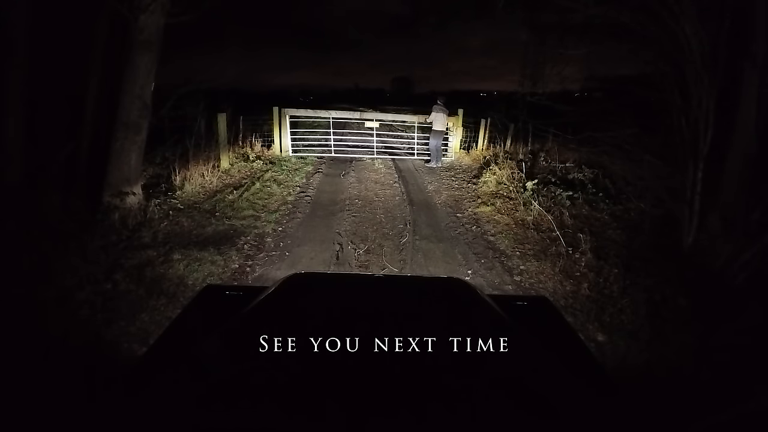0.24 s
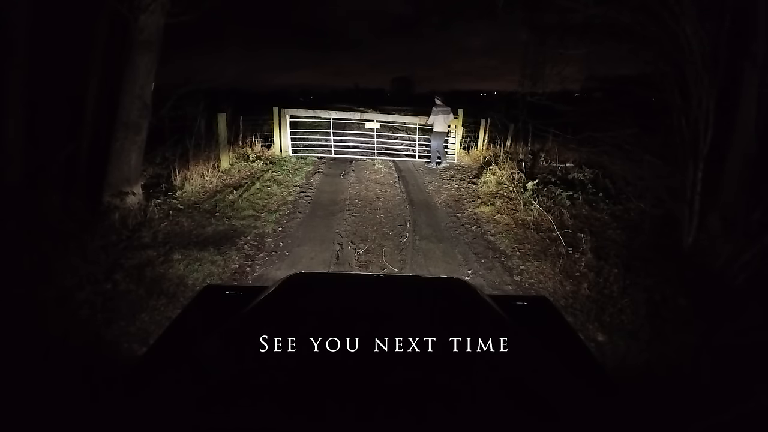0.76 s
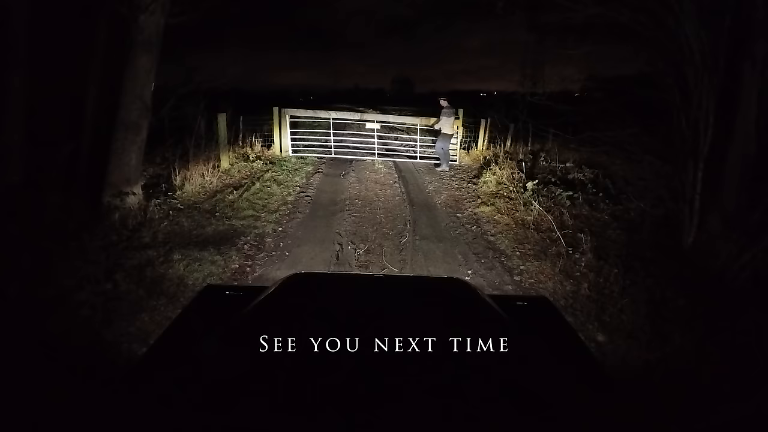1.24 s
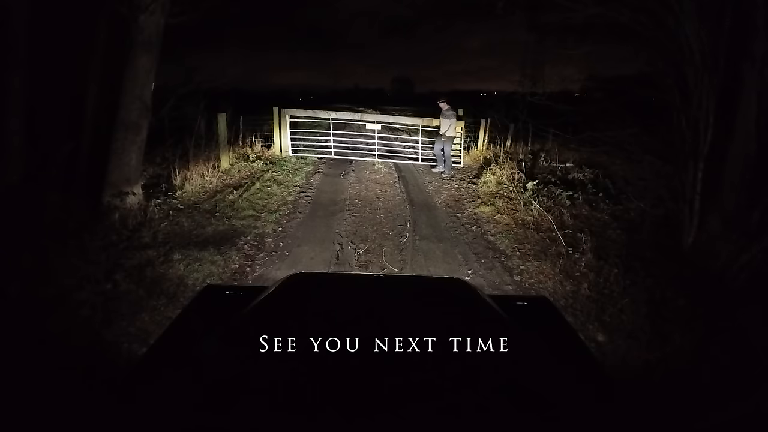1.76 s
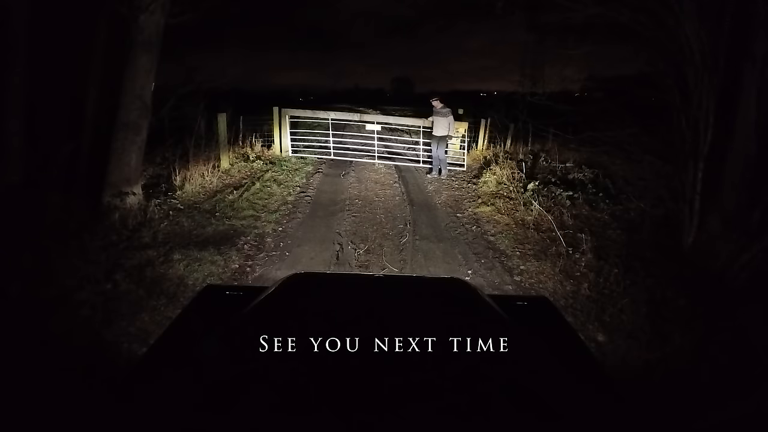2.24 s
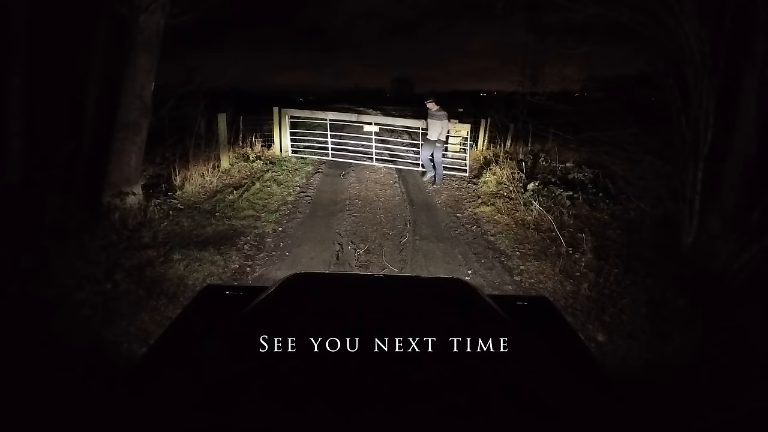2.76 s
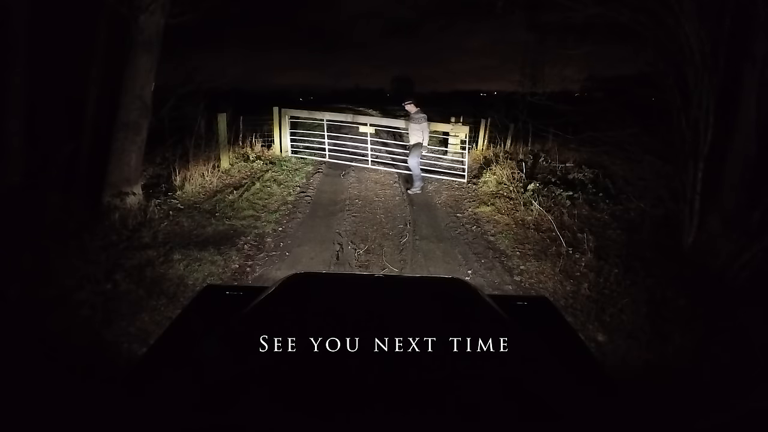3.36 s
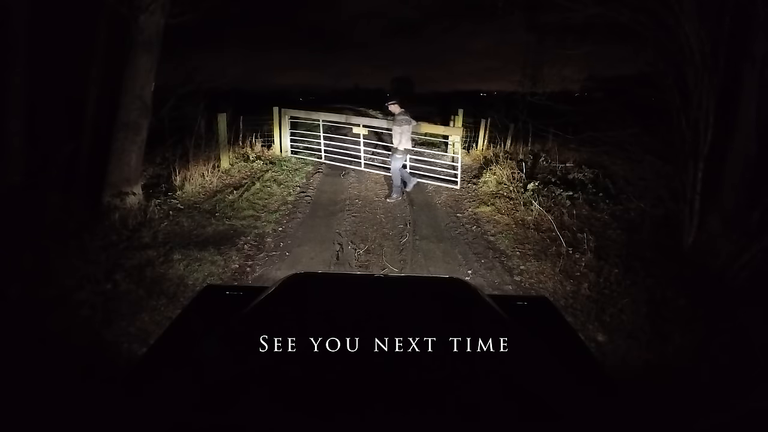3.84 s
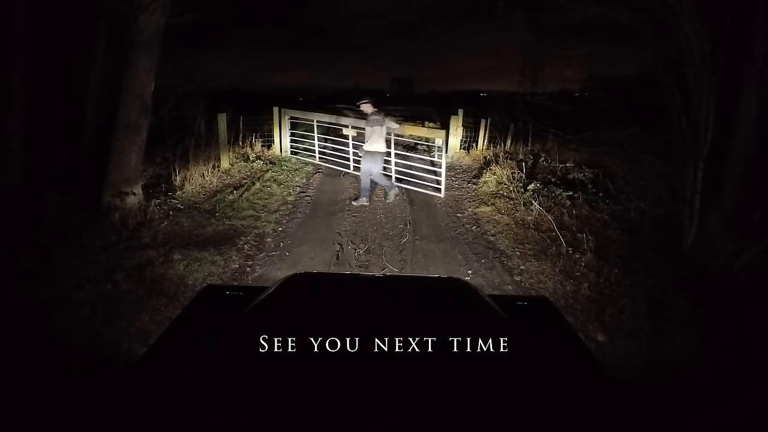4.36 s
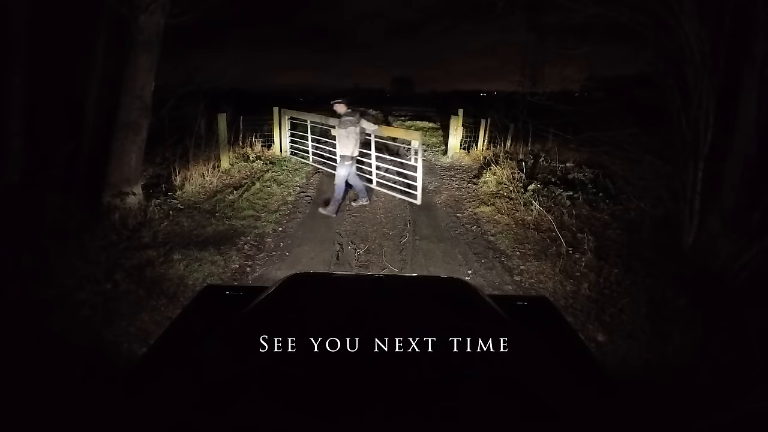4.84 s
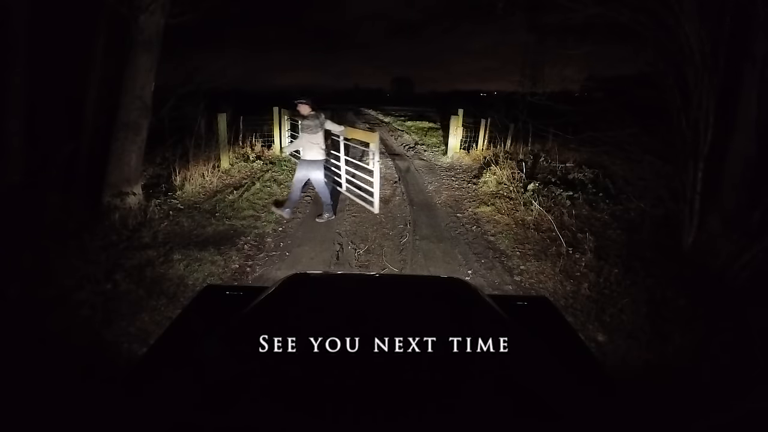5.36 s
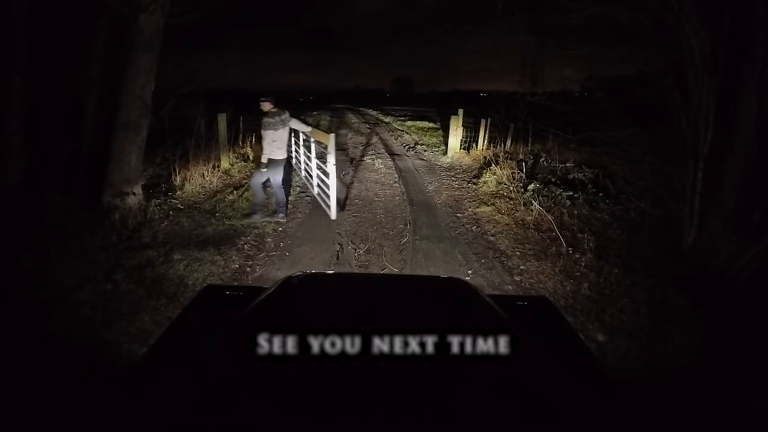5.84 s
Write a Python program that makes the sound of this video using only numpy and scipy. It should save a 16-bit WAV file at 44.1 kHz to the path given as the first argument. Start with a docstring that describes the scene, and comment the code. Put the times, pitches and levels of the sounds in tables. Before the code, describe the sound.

A vehicle engine idles steadily for the whole six seconds: a low, soft hum around 70 Hz with slight wavering, a faint belt and fan whirr, and gently pulsing machine noise. Almost immediately, at 0.01 to 0.15 s, a sprung steel bolt some way ahead slides with a rough, high stick-slip squeak and slams its stop at 0.05 s, a sharp bright clank with tiny rapid bounces. At 0.38 to 0.5 s it is let go: another brief, higher squeak and a softer double clank, with a minor tick at 0.62 s. Hollow frame knocks vanish quickly; thin bar tones between 2 and 5 kHz ring and beat for about a second, with a short scattered tail from trees. A faint crunch comes at 2.1 s, then soft gritty footsteps at about 2.7, 3.2, 3.8, 4.5, 5.0, 5.6 and 6.1 s, barely above the idle.

```python
"""Field gate unlatched beside an idling engine

A steel gate is unlatched some way ahead of a vehicle whose engine idles: firing tones, whirr and pulsing noise.
The sprung bolt squeaks in stick-slip as it slides, and clanks against its stop, once drawn and once let go.
Each contact is a noise crack that sets decaying modes ringing in the frame and bars; trees add a scattered tail.
Faint steps, swells of uneven noise, crunch on the track as the gate is walked open."""
import sys
import numpy as np
from scipy import signal
from scipy.fft import rfft, irfft, next_fast_len
from scipy.io import wavfile
from scipy.ndimage import map_coordinates

SR = 44100
rng = np.random.default_rng(int(sys.argv[2]) if len(sys.argv) > 2 else 0)


def dump_mix(stems):
    """Bounce the given channels to the path in sys.argv[1] as a 16-bit WAV at rate SR."""
    frames = np.atleast_2d(stems).T  # one column per channel
    limited = np.clip(frames, -1, 1)  # hard clip at full scale
    pcm = np.round(limited * 32767).astype(np.int16)
    wavfile.write(sys.argv[1], SR, pcm)


N = 269010
T = np.arange(N) / SR
RING = int(1.5 * SR)  # samples given to the latch sounds


def amp(db):
    """Decibels to amplitude."""
    return 10 ** (np.asarray(db) / 20)


def unit(x):
    """Scale to rms 1."""
    return x / np.sqrt(np.mean(x ** 2) + 1e-20)


def along(points, hz):
    """Read a curve of (Hz, value) points on a log frequency axis."""
    point_hz, value = np.transpose(points)
    return np.interp(np.log(hz + 1), np.log(point_hz + 1), value)


def fade(t, t60):
    """Free decay, 60 dB in t60 seconds."""
    return np.exp(-np.log(1000) * np.maximum(t, 0) / t60)


def pan(db):
    """Left and right gains for a level difference; positive leans left."""
    return amp(np.array([[.5], [-.5]]) * db)


def wobble(rate, size=N):
    """A smooth random curve, rate knots a second (2000 at most)."""
    knots = rng.standard_normal(size // 20 + 4)
    return map_coordinates(knots, [T[:size] * min(rate, 2000)])


def filtered(x, response):
    """Multiply the spectrum of x by a response of frequency."""
    n = x.shape[-1]
    padded = next_fast_len(n + SR // 4, True)
    spectrum = rfft(x, padded) * response(np.fft.rfftfreq(padded, 1 / SR))
    return irfft(spectrum, padded)[..., :n]


def noise(spectrum, channels=1, size=N):
    """Coloured noise of rms 1."""
    white = rng.standard_normal((channels, size))
    return unit(filtered(white, lambda hz: amp(along(spectrum, hz))))


def engine(firing_hz=34.9, rush_db=-51.5, throb=0.058, unsteady_db=0.5):
    """Exhaust tones on the firing rate, a whirr of belt and fan, and machine noise that pulses with each firing."""
    # exhaust tones: multiple of the firing rate, level_db
    exhaust = [(1, -59.5), (2, -44.5), (3, -51.5), (7, -68)]
    # wavering tones of belt and fan: pitch_hz, width_hz (waver knots a second), level_db
    belt_and_fan = [(165.4, 4, -65.5), (243.4, 14, -61.5), (498, 8, -71), (535.4, 18, -64.5),
                    (790, 51, -76), (898, 14, -70.5)]
    # colour of the machine noise: freq_hz, relative level_db per Hz
    rush_colour = [(20, -8.5), (45, 6), (85, 0), (130, -3), (190, -6.5), (260, -2), (420, -8), (620, -12),
                   (900, -10), (1300, -18.5), (2700, -28.5), (4200, -39.5), (7000, -39), (8000, -50),
                   (10500, -55.5), (12500, -52.5), (13500, -66)]
    # left-right likeness of the machine noise: freq_hz, correlation (0 to 1)
    likeness = [(60, 0.98), (300, 1), (700, 0.93), (1300, 0.85), (2400, 0.46), (4400, 0.27), (8000, 0)]
    # stereo lean of the whole engine: freq_hz, left_over_right_db
    lean = [(60, 1), (2400, 0), (4400, -2.5), (8000, -3.5), (15000, -7)]

    phase = 2 * np.pi * np.cumsum(firing_hz * (1 + 0.0034 * wobble(3.074))) / SR
    hum = 0
    for multiple, db in exhaust:
        level = amp(db + unsteady_db * wobble(4.9)) * np.sqrt(2)
        hum = hum + level * np.sin(multiple * phase + rng.uniform(0, 2 * np.pi))

    whirr = 0
    for hz, width, db in belt_and_fan:
        angle = 2 * np.pi * hz * T
        whirr = whirr + amp(db) * unit(wobble(width) * np.sin(angle) + wobble(width) * np.cos(angle))

    def mid_side_gains(hz):
        turn = np.arccos(np.clip(along(likeness, hz), -1, 1)) / 2
        return np.array([np.cos(turn), np.sin(turn)])

    mid, side = filtered(noise(rush_colour, channels=2), mid_side_gains)
    rush = amp(rush_db) * unit(np.array([mid + side, mid - side])) * (1 + throb * np.sin(phase))
    return filtered(hum + whirr + rush, lambda hz: pan(along(lean, hz)))


def steps(step_s=0.071, crunch_s=0.018, grit_db=3.0, clump_db=2.0):
    """Each boot presses a swell of gritty stone noise out of the track, in uneven clumps."""
    # boots on the track: peak_s, level_db
    boots = [(2.72, -78.5), (3.24, -76.5), (3.83, -75.5), (4.48, -78), (5.045, -72), (5.62, -74.5),
             (6.09, -71.5)]
    # single sharp crunches: peak_s, level_db
    crunches = [(2.098, -70), (5.014, -75.5), (5.812, -75)]
    # colour of the stones: freq_hz, relative level_db per Hz
    stone_colour = [(800, -18), (2800, 2), (5500, 4), (8000, -7.5), (11000, -10.5), (13500, -9.5),
                    (16000, -19)]

    def swells(rows, width_s):
        return sum(amp(db) * np.exp(-((T - s) / width_s) ** 2) for s, db in rows)

    weight = swells(boots, step_s) + swells(crunches, crunch_s)
    unevenness = amp(grit_db * wobble(900) + clump_db * wobble(45))
    return pan(-4.5) * weight * unit(noise(stone_colour, channels=2) * unevenness)


def trees(x, wet_db):
    """Trunks and ground scatter a short tail, different at each ear."""
    # decay of the scattered sound: freq_hz, t60_s
    tail_decay = [(500, 0.36), (2500, 0.43), (5000, .39), (9000, 0.26), (14000, .22)]
    hz, t, z = signal.stft(rng.standard_normal((2, SR)), SR, nperseg=256)
    decayed = z * fade(t, along(tail_decay, hz)[:, None])
    tail = signal.istft(decayed, SR, nperseg=256)[1]
    tail = tail / np.linalg.norm(tail[0])
    return amp(wet_db) * signal.fftconvolve(x, tail, axes=1)[:, :x.shape[1]]


def sliding(t, hold_s=0.01186, t60_s=0.2096):
    """How hard the bolt rubs in its sleeve: each slide rises, holds at full speed and dies."""
    # drawn, then let go: full_speed_s, rise_s, level_db
    slides = [(0.051, 0.043, -38), (.398, 0.03, -43.5)]
    rub = 0
    for s, rise, db in slides:
        gathering = np.clip(1 + (t - s) / rise, 0, 1) ** 2
        rub = rub + amp(db) * gathering * fade(t - s - hold_s, t60_s)
    return rub


def contacts(count=6, first_gap_s=.0063, widen=1.22, uneven=.12, knock_follows=0.69):
    """Each blow and its ever weaker bounces, as rows (s, crack dB, knock dB, ring dB, bolt position)."""
    # the bolt striking steel: start_s, level_db, knock_db and ring_db (both relative to level_db),
    # loss_db per bounce, bolt position (0 drawn to 1 let go)
    blows = [(.032, -38.5, -16, 2, 13, 0.086), (0.0507, -24, -0.5, -1.5, 3.3, 0.018),
             (.408, -32.5, -10, -2, 8, 0.49), (.4213, -30, -0.5, 0, 2.5, 0.88),
             (.474, -43.5, 9, -2, 9.5, 0.87), (.620, -59, -15, -5, 5, .4)]
    rows, bounce = [], np.arange(count)
    for s, db, knock_db, bars_db, loss_db, position in blows:
        # gaps widen by a ratio, unevenly
        gaps = first_gap_s * widen ** bounce * np.exp(uneven * rng.standard_normal(count))
        times = s + np.cumsum(gaps) - gaps
        lost_db = loss_db * bounce
        # the frame's knock follows only a share of the loss
        knocks = db + knock_db - knock_follows * lost_db
        rows += zip(times, db - lost_db, knocks, db + bars_db - lost_db, [position] * count)
    return np.array(rows)


def ringing(modes, blows, scatter_db, flutter, flutter_rate=90):
    """Modes fed by (s, dB, bolt position) blows; the loose bolt makes each one beat, differently at each ear."""
    out, t = np.zeros((2, RING)), T[:RING]
    s, db, position = np.transpose(blows)
    for hz, drawn_db, free_db, t60 in modes:
        mode_db = drawn_db + position * (free_db - drawn_db)
        size = amp(db + mode_db + scatter_db * rng.standard_normal(len(s)))
        # each blow adds energy, which then leaks away
        struck = np.bincount((s * SR).astype(int), size ** 2, RING)
        energy = signal.lfilter([1], [1, -fade(1 / SR, t60) ** 2], struck)
        # part of the flutter is shared by both ears
        knots = rng.standard_normal((3, 200)) + 1j * rng.standard_normal((3, 200))
        left, right, both = (np.interp(t * flutter_rate, np.arange(len(k)), k) for k in knots)
        beats = (1 + flutter * (both + np.array([left, right]) / 2)) / np.sqrt(1 + 2 * flutter ** 2)
        carrier = np.exp(2j * np.pi * (hz * t + rng.random()))
        out += np.sqrt(energy) * np.real(beats * carrier)
    return out


def clanks(ring_db=-11, tube_db=-13.0, grit_db=2.5, crack_t60_s=.08):
    """The bolt scrapes along; each contact cracks, knocks the hollow frame and rings the bars."""
    # bolt and gate bars: pitch_hz, drawn_db, let_go_db, t60_s
    bar_modes = [(2392, 0.5, -20.5, .58), (2440, -9.5, -9.5, 1.32), (2440, -8, -16.5, 0.292),
                 (2720, -23, -28, 0.32), (2833, -23.5, -9, 0.66), (2970, -16, -15.5, 0.58),
                 (3035, -4, -18, .4), (3320, -9.5, -23.5, 0.2), (3510, -20.5, -16.5, 0.36),
                 (4268, -13.5, -3.5, 0.81), (4470, -13, -18, 0.48), (4750, -7.5, -26.5, .38),
                 (4745, -11, -13, 0.425), (5200, -21.5, -21, .38), (7240, -20, -30, 0.45)]
    # the quickly damped hollow frame: pitch_hz, drawn_db, let_go_db, t60_s
    frame_modes = [(558, -5, -23, 0.083), (686, -3, -21, 0.084), (790, -0.5, 3, 0.068),
                   (835, -2.5, 0, 0.082), (1010, -13.5, -15, 0.081), (1160, -5.5, 0.5, .11),
                   (1260, -10, -6, 0.11), (1471, -3, -6, 0.11), (1710, -1.5, -21, 0.07),
                   (1967, -4.5, -6.5, .1)]
    # crowded short-lived modes of a hard contact: freq_hz, relative level_db per Hz
    hard_colour = [(350, -41), (550, -10.5), (1700, -7.5), (2100, -8.5), (2700, 4), (3400, -2.5),
                   (4900, -4), (6200, -8.5), (8000, -12), (10500, -20), (13000, -19.5), (16000, -32.5)]
    # the same for a softer contact: freq_hz, relative level_db per Hz
    soft_colour = [(400, -45), (800, -14.5), (1800, -16), (2700, 0.5), (3300, -5.5), (3700, -0.5),
                   (5000, -5), (6200, -8), (7500, -20), (8600, -17), (9300, -31.5), (13000, -27.5),
                   (16000, -44.5)]
    # colour of the bolt's scrape: freq_hz, relative level_db per Hz
    scrape_colour = [(400, -34.5), (700, 3.5), (1800, -4), (2800, 0), (3900, 3.5), (5500, 4.5), (8500, -17),
                     (10000, -32), (13000, -12), (16000, -41.5)]

    hard, soft, t = np.zeros(RING), np.zeros(RING), T[:RING]
    times, crack_db, knock_db, bars_db, positions = contacts().T
    crack_fade = fade(T[:SR // 2], crack_t60_s)
    for s, db, position in zip(times, crack_db, positions):
        energy = soft if position > .5 else hard
        energy[round(s * SR):][:SR // 2] += (amp(db) * crack_fade) ** 2
    crack = np.sqrt(hard) * noise(hard_colour, size=RING) + np.sqrt(soft) * noise(soft_colour, size=RING)
    scrape = sliding(t) * noise(scrape_colour, size=RING)
    chatter = unit(amp(grit_db * wobble(700, size=RING)))  # rough faces touch in tiny bounces

    bar_blows = np.c_[times, bars_db + ring_db, positions]
    frame_blows = np.c_[times, knock_db + tube_db, positions]
    bars = ringing(bar_modes, bar_blows, scatter_db=1.5, flutter=0.6)
    frame = ringing(frame_modes, frame_blows, scatter_db=2.1, flutter=0.83)
    return pan(-2.5) * chatter * (crack + scrape) + pan(-2) * bars + pan(1.15) * frame


def squeaks(octave_db=4.5, release_lengths=2.07, waver=0.0027, catch_waver=.012, rasp_db=0.5,
            pan_db=-3, overtone_pan_db=-9, rise_s=0.013, sharp=.02, settle_s=0.0063):
    """Stick-slip catches roughly and sharp, locks on to one mode of the bolt, and dies when the sliding stops."""
    # the bolt sticking and slipping: start_s, length_s before release, settled pitch_hz, level_db
    slips = [(.010, 0.0092, 2430, -36), (.021, 0.024, 2386, -27.5), (.063, 0.016, 2417, -28.5),
             (.124, 0.049, 2395, -39.5), (.377, .011, 2937, -30.5), (.388, 0.02, 1400, -42),
             (.388, 0.037, 4266, -37), (.390, 0.02, 2837, -29), (.402, 0.027, 4840, -35.5),
             (0.414, 0.065, 2431, -30), (0.51, 0.024, 4268, -44)]
    # a harder grip is brighter: squeak level_db, change per overtone_db
    brightness = [(-30, -40), (-29.5, -21), (-28, -8)]

    out, t = np.zeros((2, RING)), T[:SR // 4]
    loose = np.exp(-t / settle_s)
    for start, length, hz, db in slips:
        unsteady = (waver + catch_waver * loose) * wobble(540, size=len(t))
        pitch = hz * (1 + sharp * loose + unsteady)
        phase = 2 * np.pi * np.cumsum(pitch) / SR
        # a long squeak dies slowly
        swell = np.clip(t / rise_s, 0, 1) ** 2 * fade(t - length, release_lengths * length)
        grip = amp(db + rasp_db * wobble(250, size=len(t))) * np.sqrt(2)
        fall_db = np.interp(db, *np.transpose(brightness))
        for k in np.arange(6):
            # the overtones need full grip, and beam toward the right
            level = amp(k * fall_db + octave_db * (k == 1)) * grip * swell ** (1 + k / 2)
            partial = level * np.sin((k + 1) * phase)
            out[:, round(start * SR):][:, :len(t)] += pan(overtone_pan_db if k else pan_db) * partial
    return out


def scene():
    """The latch stands a little to the right, so it reaches the left ear later."""
    # left ear's delay: freq_hz, lag_radians
    ear_lag = [(100, 0.18), (1000, .3), (2400, 0.8), (3000, 0.98), (4800, 1.32), (7000, 1.61), (14000, 2.1)]
    squeak, clank = squeaks(), clanks()
    ears = np.array([[-1], [1]])
    direct = filtered(squeak + clank, lambda hz: np.exp(.5j * along(ear_lag, hz) * ears))
    out = engine() + steps()
    out[:, :RING] += direct + trees(clank, wet_db=-8.0) + trees(squeak, wet_db=-13.5)
    return out


def record(dry, top_hz=15500):
    """Nothing is kept above the band limit."""
    return filtered(dry, lambda hz: hz < top_hz)


dry = scene()
out = record(dry)
dump_mix(out)
```